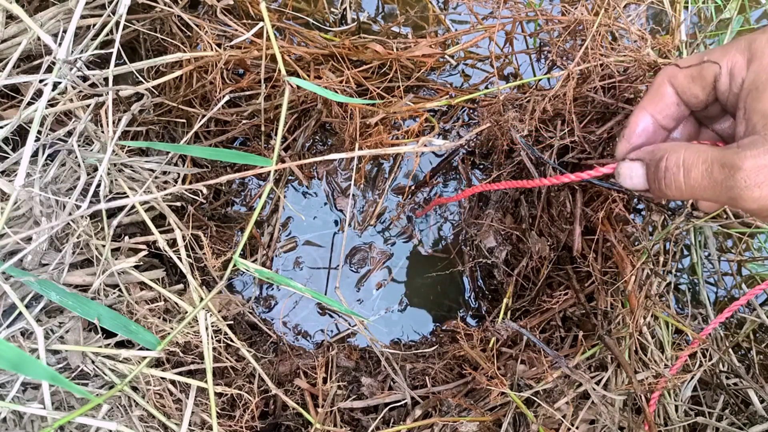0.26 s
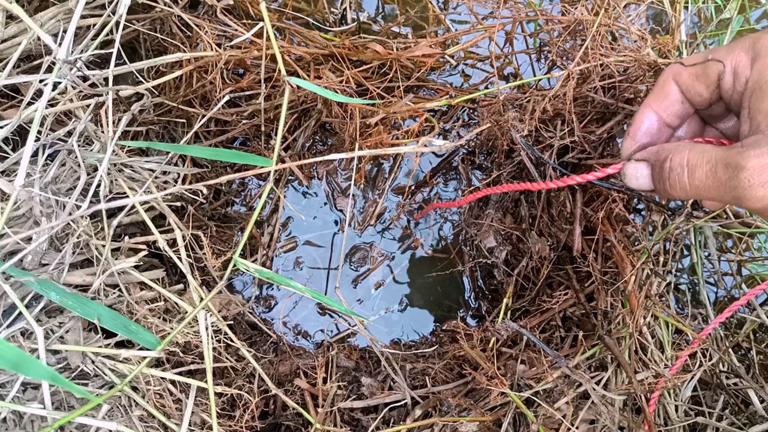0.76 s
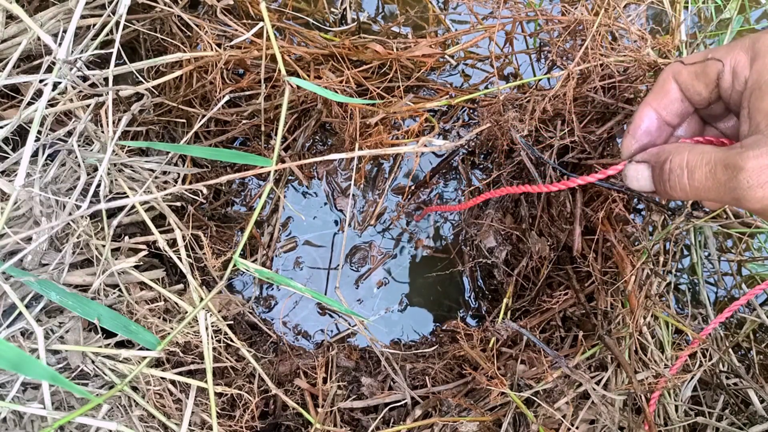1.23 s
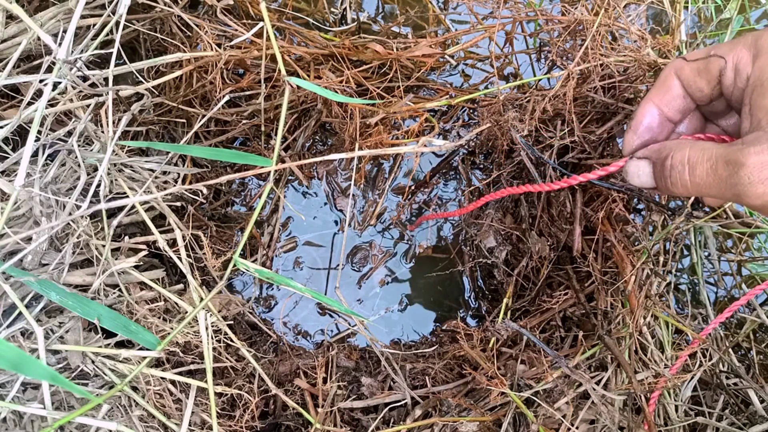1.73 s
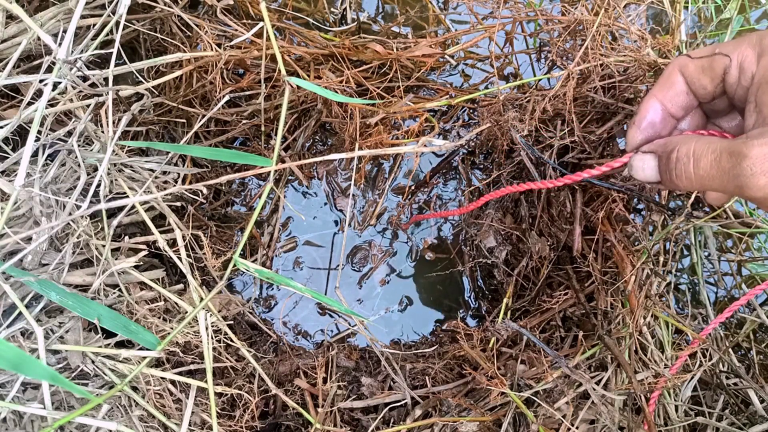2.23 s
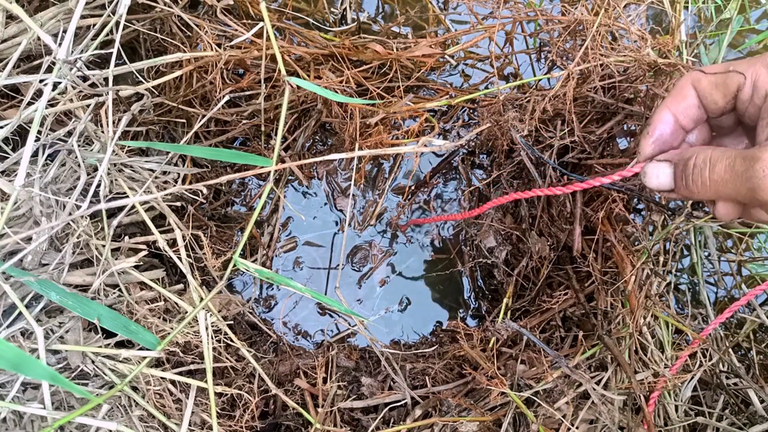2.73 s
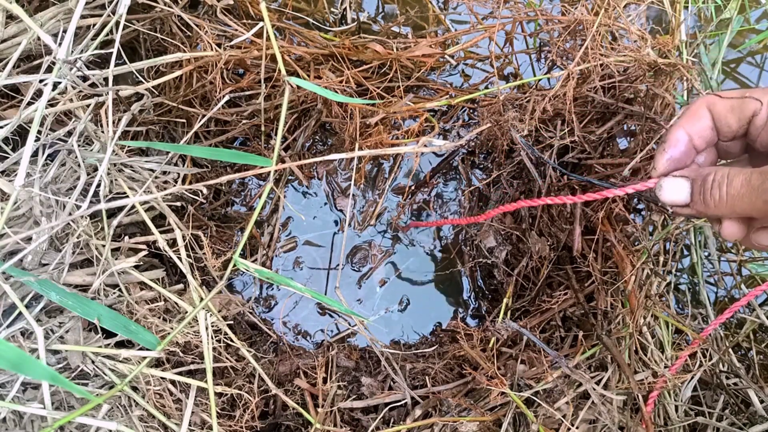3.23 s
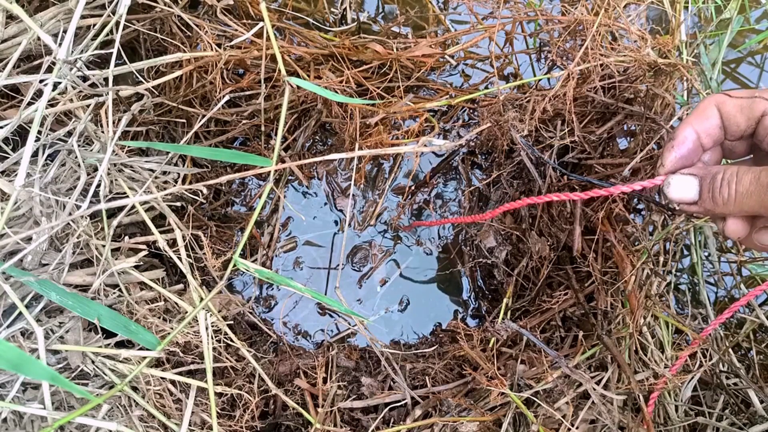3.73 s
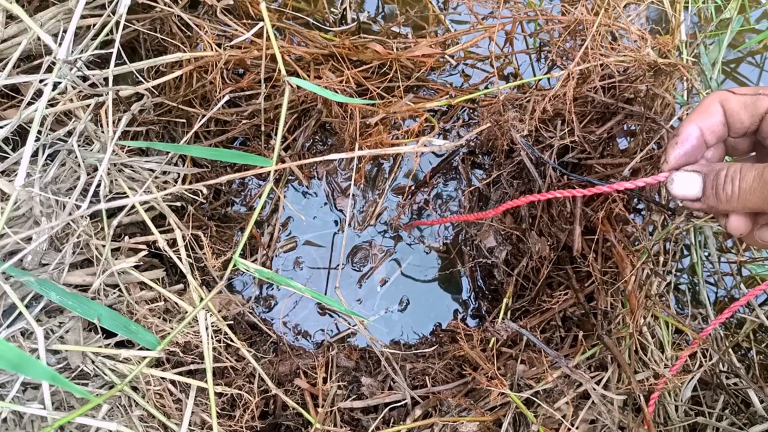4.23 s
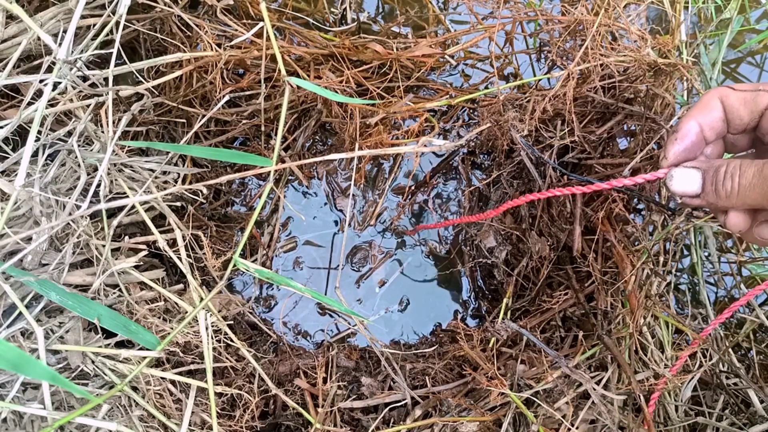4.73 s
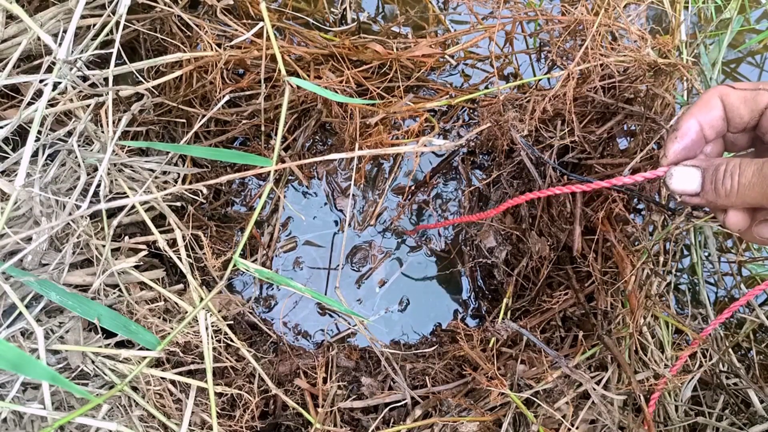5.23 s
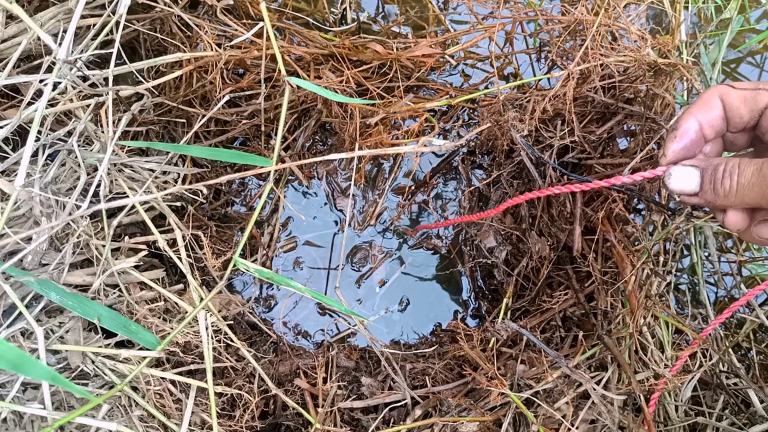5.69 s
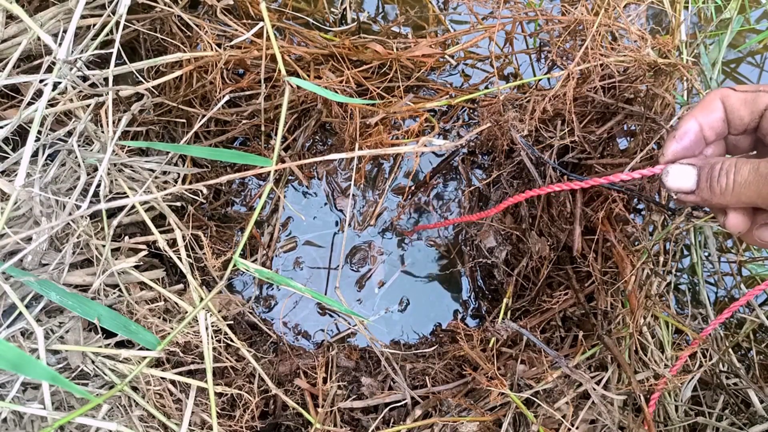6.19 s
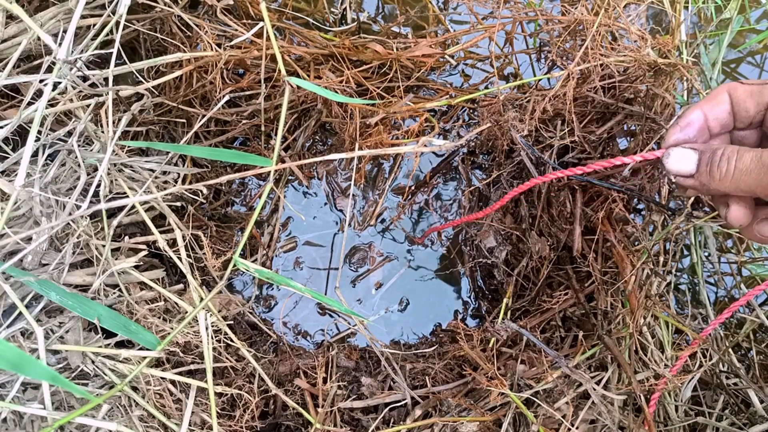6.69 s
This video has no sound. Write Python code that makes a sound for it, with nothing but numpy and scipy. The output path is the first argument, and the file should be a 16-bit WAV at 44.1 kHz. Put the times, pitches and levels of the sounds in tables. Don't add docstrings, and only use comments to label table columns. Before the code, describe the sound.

A quiet outdoor wetland with steady, very high insect song: a fast trill swelling about once a second on the left, a throbbing chorus and short cricket bouts on the right. A rasp joins on the left until nearly three seconds. From about four to five seconds, dry creaky ticks snap very close, stronger on the right, then only insects remain over faint rumble and soft air hiss.

```python
import sys
import numpy as np
from scipy import signal
from scipy.io import wavfile
from scipy.ndimage import uniform_filter1d

SR = 44100
rng = np.random.default_rng(int(sys.argv[2]) if len(sys.argv) > 2 else 0)


def invert_db(level):
    return 10 ** (np.asarray(level, dtype=float) / 20)


def store_wav(level_fs):
    pcm = np.round(np.clip(np.atleast_2d(level_fs), -1, 1) * 32767)
    wavfile.write(sys.argv[1], SR, pcm.T.astype(np.int16))


N = 306495

# frequency in Hz, level in dB per Hz.
AIR_SPECTRUM = [(15, -88.5), (30, -82.5), (60, -73), (130, -79), (230, -87), (330, -97.5), (700, -105),
                (2000, -111), (3000, -117), (3800, -120), (6000, -118), (16000, -119)]
# frequency in Hz, likeness from 0 to 1.
AIR_LIKENESS = [(60, 0.98), (130, 1), (290, 0.8), (640, 0.55), (1400, 0.05)]
# first pulse in seconds, pulses per second, lull level in dB, swell length in seconds, top level in dB.
TRILL_PHRASES = [
    (.0092, 92, -67.5, 0.71, -61.5),
    (1.018, 88, -70, 0.64, -61),
    (2.0803, 96, -67, 0.45, -61.5),
    (3.161, 91, -69.5, 0.23, -63.5),
    (4.2083, 88.3, -66, .7, -63.5),
    (5.269, 97, -65.5, 0.86, -61),
    (6.368, 102, -69, 0.5, -64),
]
# time in seconds, level in dB.
CHORUS_LEVEL = [
    (0.0, -70),
    (1.3, -71),
    (4.3, -68.5),
    (6.95, -70),
]
# start in seconds, end in seconds, pairs per second, level in dB.
CRICKET_BOUTS = [
    (.0084, .37, 23.9, -63),
    (1.0685, 1.47, 23.9, -64),
    (2.2224, 2.54, 23.55, -63),
    (3.3223, 3.64, 24.0, -64),
    (4.386, 4.71, 23.9, -68),
    (5.4186, 5.79, 23.65, -65),
    (6.5419, 6.91, 23.45, -65),
]
# start in seconds, pitch in Hz, length in seconds, level in dB.
FAR_NOTES = [
    (1.431, 3560, 0.034, -74),
    (1.445, 1770, 0.032, -76),
    (2.745, 948, 0.024, -69.5),
    (4.572, 3650, 0.0059, -51.5),
    (4.58, 3750, .007, -58),
    (4.921, 3580, 0.015, -66.5),
    (4.964, 1510, .012, -66),
    (3.836, 3350, 0.0096, -66),
]
# frequency in Hz, width in Hz, level in dB.
SHELL_MODES = [(454, 183, 1), (950, 359.5, -10), (1460, 290, 2.5), (2020, 480, 5.5)]
# frequency in Hz, width in Hz, level in dB.
PLATE_MODES = [(3490, 240, -7.5), (3560, 750, -14), (4230, 660, -1.5)]
# time in seconds, thud in dB, plate ring in dB, crack in dB, ring pitch in Hz.
CASE_SNAPS = [(3.8565, -82, -36, -34, 4200), (4.0602, -44.5, -65, -58, 2650), (4.135, -27, -21, -17, 4200),
              (4.1409, -42, -20, -26, 4070), (4.1445, -42, -21, -21, 3700), (4.1498, -29, -21, -28, 3600),
              (4.1542, -26, -8, -16, 3460), (4.1641, -10.5, -12.5, -13.5, 2506),
              (4.1664, -23.5, -23, -34, 2440), (4.3225, -19.5, -30, -51, 3490),
              (4.3243, -19.5, -46, -40, 3490), (4.4813, -36.5, -31, -36, 3520),
              (4.4932, -33, -22.5, -30, 2450), (4.4986, -36, -23, -48, 3310), (4.5059, -27, -28, -43, 3160),
              (4.512, -24.5, -20.5, -55, 3300), (4.5131, -24.5, -27, -55, 2950),
              (4.6681, -17, -24.5, -25, 3240), (4.7703, -40, -65, -70, 1500), (4.8471, -22, -17, -41, 3040),
              (4.8494, -17, -19.5, -40, 2880), (5.0178, -49, -19.5, -40.5, 3310),
              (5.0398, -28, -16, -34, 3130), (5.042, -16.5, -22.5, -28, 3250)]
# start in
# seconds, time to release in seconds, start level in dB, release level in dB, ring over thud in dB.
CASE_CREAKS = [
    (4.1367, 0.028, -35, -23.5, 3.5),
    (4.3006, .021, -37.5, -40, -5),
    (4.4825, 0.025, -33, -32.5, -2),
    (4.6562, 0.013, -33, -42.5, -17),
    (4.8276, 0.017, -30, -30, -4),
    (5.0208, 0.031, -25.5, -41, -2.5),
]
# frequency in Hz, gain in dB.
CASE_TO_LEFT = [(3600, -2.5), (6600, -13), (7900, -16), (8600, -4.5), (10800, -3.5), (11400, 13),
                (13800, 4), (14200, -24)]
# frequency in Hz, gain in dB.
CASE_TO_RIGHT = [(3600, 0), (4600, -2), (7200, 4.5), (8200, -9.5), (10000, -14), (10700, 3), (13300, 1.5),
                 (14200, -2)]
# frequency in Hz, gain in dB.
LEFT_COLOUR = [(3500, -1), (5200, -4.5), (6200, -22.5), (6600, -8), (7600, -7.5), (8800, 4), (10000, 4.5),
               (10900, 0.5), (11200, -32), (12500, -28), (14000, -29), (14700, -50)]
# frequency in Hz, gain in dB.
RIGHT_COLOUR = [(3500, -.5), (6000, -3), (8000, 0), (8600, -4), (10000, -5), (10500, -22), (11500, -18),
                (12500, -7.5), (13700, -6.5), (14200, .5), (15400, -3.5), (15800, -55)]


def evened(x):
    return x / np.sqrt(np.mean(x ** 2) + 1e-20)


def read(points, hz):
    f, value = np.transpose(points)
    return np.interp(np.log(hz + 1), np.log(f + 1), value)


def resonate(x, hz, width):
    turn = np.exp(2j * np.pi * np.cumsum(hz * np.ones(len(x))) / SR)
    r = np.exp(-np.pi * width / SR)
    return 2 * (turn * signal.lfilter([1 - r], [1, -r], x / turn)).real


def whistle(hz, width):
    once = resonate(rng.standard_normal(N), hz, width)
    return evened(resonate(once, hz, width))


def drift(seconds):
    span = int(seconds * SR)
    smooth = uniform_filter1d(rng.standard_normal(N), span)
    return evened(uniform_filter1d(smooth, span))


def hump(phase, duty):
    return np.sin(np.pi * np.clip(phase / duty, 0, 1)) ** 2


def modes(table):
    t = np.arange(1500) / SR
    return sum(invert_db(db) * np.exp(-np.pi * width * t) * np.sin(2 * np.pi * hz * t) for hz, width, db in table)


def port(x, colour):
    log_gain = np.log(invert_db(read(colour, abs(np.fft.fftfreq(4096, 1 / SR)))))
    taps = np.fft.ifft(np.exp(np.conj(signal.hilbert(log_gain)))).real[:2048]
    return signal.oaconvolve(x, taps)[:N]


def air():
    frames, hz = N // 512 + 6, np.fft.rfftfreq(2048, 1 / SR)
    a, b, c, d, patches = rng.standard_normal((frames, 1025, 5)).T
    patches = evened(uniform_filter1d(uniform_filter1d(patches, 20, 0), 6, 1))
    same = np.clip(read(AIR_LIKENESS, hz), 0, 1)[:, None]
    left = a + 1j * b
    right = same * left + np.sqrt(1 - same ** 2) * (c + 1j * d)
    spectra = np.array([left, right])
    spectra *= invert_db(read(AIR_SPECTRUM, hz)[:, None] + 0.85 * patches + 16.5)
    return signal.istft(spectra, nperseg=2048, noverlap=1536)[1][:, :N] * invert_db([[-.6], [.4]])


def strokes(phase, centre_hz):
    hz = centre_hz - 1000 * (phase - .36) + 40 * drift(.01)
    tone = np.sin(2 * np.pi * np.cumsum(hz) / SR)
    return evened(tone * hump(phase, .74) ** .7 * invert_db(2.2 * drift(.012)))


def trill():
    t = np.arange(N) / SR
    start, per_s, lull_db, swell, top_db = np.transpose(TRILL_PHRASES)
    k = np.maximum(np.searchsorted(start, t) - 1, 0)
    since = t - start[k]
    near = strokes((since * per_s[k] + .37) % 1, 9890)
    rival = strokes(np.cumsum(93 + 3.0 * drift(.1)) / SR % 1, 9830)
    others = .6 * rival + .8 * whistle(9870, 480) + .3 * whistle(9450, 600) + .04 * whistle(10500, 700)
    lull = start + .1
    effort_times = np.ravel([lull, lull + swell], "F")
    effort_db = np.interp(t, effort_times, np.ravel([lull_db, top_db], "F"))
    crowd = invert_db(2 - 8 * since)
    mix = (near + crowd * others) / np.sqrt(.5 + .5 * crowd ** 2)
    return invert_db(effort_db) * mix * invert_db([[-4], [-62]])


def chorus():
    seconds, level_db = np.transpose(CHORUS_LEVEL)
    effort_db = np.interp(np.arange(N) / SR, seconds, level_db)
    phase = (np.cumsum(77.2 + 1.1 * drift(.2)) / SR) % 1
    throb = .65 + .7 * hump(phase, .7)
    voices = whistle(7030, 340) * throb + invert_db(-9) * whistle(6600, 300)
    return invert_db(effort_db) * invert_db(1.3 * drift(0.02)) * voices * invert_db([[-22], [3]])


def cricket():
    t, gate = np.arange(N) / SR, np.zeros(N)
    for first, end, per_s, db in CRICKET_BOUTS:
        since = ((t - first + 0.013) * per_s % 1) / per_s
        pair = .85 * hump(since, .0095) + hump(since - .012, .0105)
        gate += invert_db(db) * pair * (t > first - .0115) * (t < end)
    tone = np.sin(2 * np.pi * np.cumsum(4815 + 15 * drift(.02)) / SR)
    chirps = tone * gate * invert_db(1.8 * drift(.03))
    far = np.array([whistle(4780, 420), whistle(4780, 420)]) * invert_db([[-82.5], [-78]])
    return np.array([np.roll(chirps, 5), chirps]) * invert_db([[-5], [2]]) + far


def katydid():
    t = np.arange(N) / SR
    bursts = .3 + .7 * hump((t - 1.975) * 9.1 % 1, .95)
    rasp = hump(t * 136 % 1, .7)
    on = np.clip(np.minimum(t + .4, 10 * (2.76 - t)) / 0.3, 0, 1)
    return invert_db(-66) * whistle(9700, 830) * bursts * rasp * on * invert_db([[0], [-40]])


def peeps():
    t = np.arange(N) / SR
    notes = sum(invert_db(db) * hump(t - s, length) * np.sin(2 * np.pi * hz * t) for s, hz, length, db in FAR_NOTES)
    notes = np.array([np.roll(notes, -12), notes])
    return notes * (1 + .5 * drift(0.00064)) * invert_db([[-3], [2]])


def slips():
    gap_s, scatter_db, settle_db_per_s = .0026, 1, 894.5
    grip_s, settle_s = .0077, .024
    rows = [np.array(CASE_SNAPS)]
    for start, build, first_db, last_db, ring_db in CASE_CREAKS:
        gap, a, b, c, d = rng.random((24, 5)).T
        waits = gap_s * (.5 + gap)
        since = np.cumsum(waits) - waits[0]
        db = np.interp(since, [0, build], [first_db, last_db])
        db = db - settle_db_per_s * np.maximum(since - build, 0)
        db = db - 8 * np.exp(-since / grip_s) - 60 * (since > build + settle_s)
        thud, ring, crack = (db + scatter_db * (2 * u - 1) for u in (a, b, c))
        hz = 3250 + 380 * 2 * (2 * d - 1)
        rows.append(np.transpose([start + since, thud, ring + ring_db, crack + ring_db - 3.5, hz]))
    return np.concatenate(rows).T


def creaks():
    s, thud_db, ring_db, crack_db, ring_hz = slips()
    at = np.round(s * SR).astype(int)
    thud, ring, crack, own = np.zeros((4, N))
    thud[at], ring[at], crack[at] = invert_db(thud_db), invert_db(ring_db), invert_db(crack_db)
    t = np.arange(900) / SR
    swell = (1 - np.exp(-t / .0003)) * np.exp(-t / .0015)
    for start, db, hz in zip(at, ring_db, ring_hz):
        own[start - 12:start + 888] -= invert_db(db) * swell * np.sin(2 * np.pi * hz * t)

    rattle = signal.oaconvolve(thud + 0.32 * ring, np.exp(-t / 0.0025))[:N] * rng.standard_normal(N)
    fizz_decay = np.exp(-t / 0.000957) + 0.292 * np.exp(-t / 0.0054)
    fizz = signal.oaconvolve(crack, fizz_decay)[:N] * rng.standard_normal((2, N))
    fizz = signal.sosfilt(signal.butter(2, 5200, "high", fs=SR, output="sos"), fizz)
    fizz = fizz - invert_db(4) * signal.oaconvolve(crack, modes([(6900, 1300, 0.0022)]))[:N]

    body = -signal.oaconvolve(thud + invert_db(-24) * rattle, modes(SHELL_MODES))[:N] * invert_db(-6.5)
    struck = invert_db(-0.5) * ring + invert_db(-32.5) * rattle
    plate = invert_db(3.5) * own - signal.oaconvolve(struck, modes(PLATE_MODES))[:N]
    plate = resonate(plate, 4400, 4590)
    push = -invert_db(-3.5) * signal.oaconvolve(thud, signal.windows.hann(13))[:N]
    sides = np.array([invert_db(-5.5) * (body + push) + invert_db(-3.5) * plate, body + push + plate])
    sides = signal.sosfilt(signal.butter(4, 330, "high", fs=SR, output="sos"), sides)
    left, right = sides + fizz * invert_db([[-9], [-4]])
    return np.array([port(left, CASE_TO_LEFT), port(right, CASE_TO_RIGHT)])


def late_singer():
    on = np.clip((np.arange(N) / SR - 5.1) / .2, 0, 1)
    return invert_db(-84.5) * whistle(7440, 200) * on * invert_db([[0], [4]])


def scene():
    insects = trill() + chorus() + cricket() + katydid() + late_singer()
    return air() + insects + peeps() + creaks()


def low_pass(x):
    return signal.sosfilt(signal.butter(12, 16640, fs=SR, output="sos"), x)


def record(dry):
    left = np.roll(port(dry[0], LEFT_COLOUR), 12)
    right = port(dry[1], RIGHT_COLOUR)
    return low_pass(np.array([left, right]))


dry = scene()
out = record(dry)
store_wav(out)
```